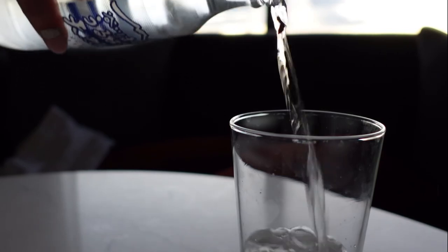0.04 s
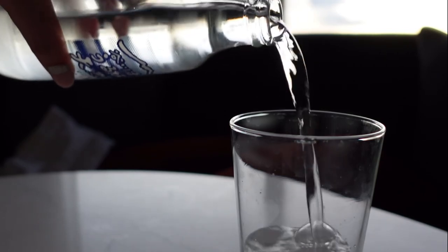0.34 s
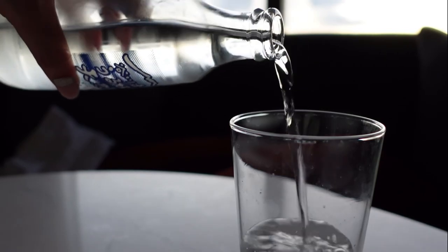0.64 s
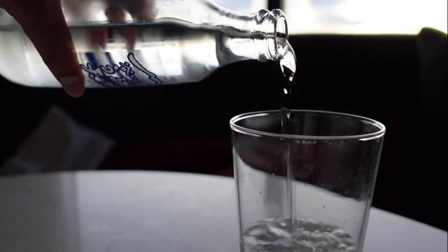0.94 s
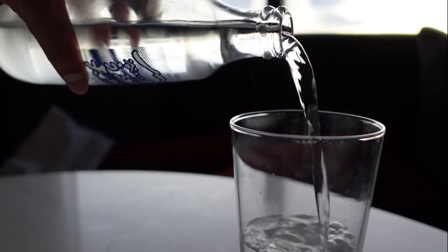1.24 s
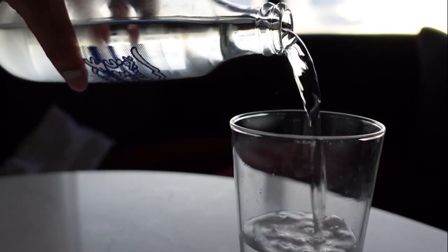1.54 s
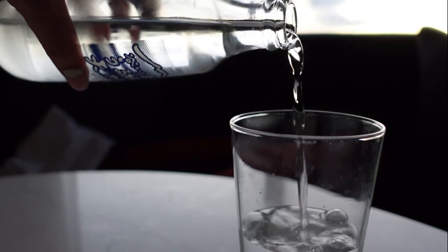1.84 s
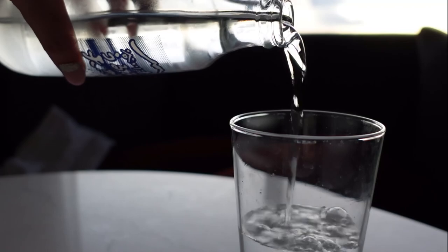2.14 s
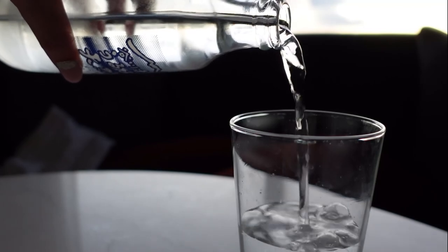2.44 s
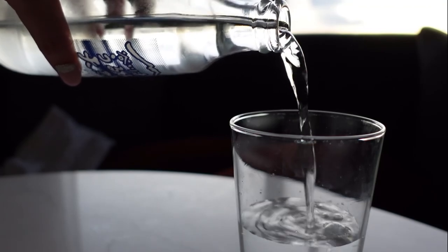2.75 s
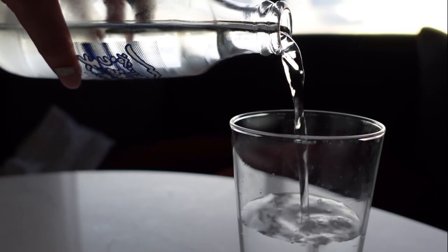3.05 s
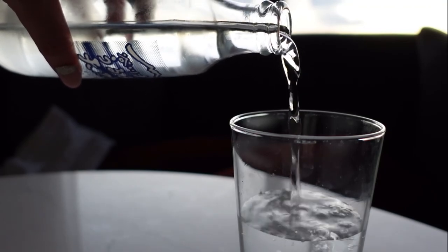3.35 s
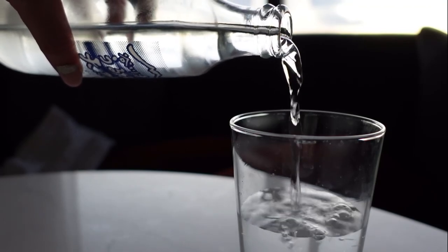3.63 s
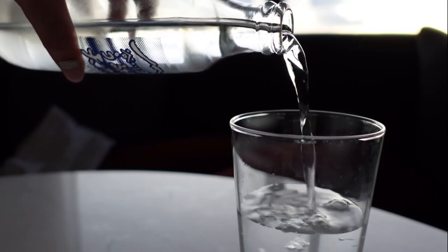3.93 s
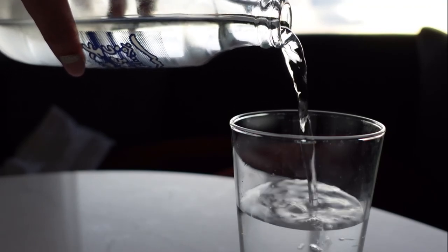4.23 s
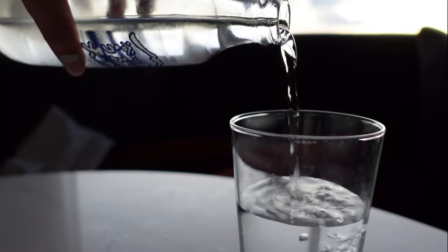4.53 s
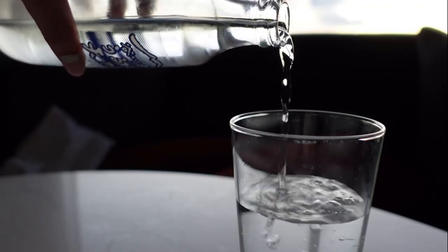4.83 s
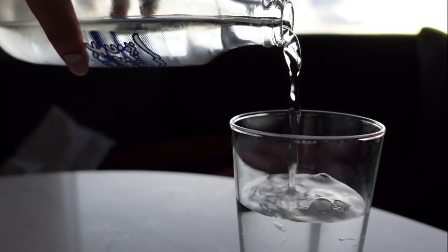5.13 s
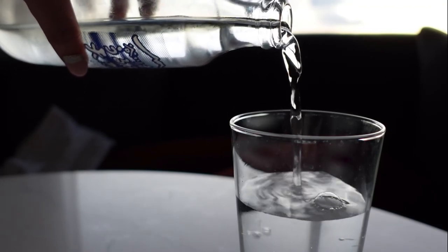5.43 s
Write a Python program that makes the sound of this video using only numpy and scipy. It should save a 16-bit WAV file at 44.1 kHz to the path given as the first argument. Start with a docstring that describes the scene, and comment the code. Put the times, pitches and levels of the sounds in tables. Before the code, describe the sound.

Water pours from a bottle into a drinking glass, close to the microphone and almost straight ahead, in a small quiet room. The pour is under way from the start, with bright splashing, bubbling plinks, tiny sharp pops and a few short hollow glugs. It eases briefly around 0.5 seconds, then surges again from about 0.8 to 1.4 seconds. After another dip, a cluster of plinks and crisp pops comes between 1.8 and 2.1 seconds, with a smaller one near 2.6. From about 3 seconds the stream is softer and thinner, a light trickle with separate plinks and occasional quick rising bubble chirps, picking up slightly around 4.2 and 4.8 seconds. The hollow ring of the glass climbs gently in pitch as it fills. The trickle is faint by the end, at about 5.7 seconds, over a very low room hush.

```python
"""Water poured from a bottle into a drinking glass on a table, close up, in a small quiet room.
The stream drags air under: each bubble rings briefly, small ones burst at the surface with sharp pops.
The air above the water rings along and climbs in pitch as the glass fills.
The splashing thins out to single plinks and whoops."""
import sys
import numpy as np
from scipy import signal
from scipy.io import wavfile
from scipy.ndimage import uniform_filter1d

SR = 44100
rng = np.random.default_rng(int(sys.argv[2]) if len(sys.argv) > 2 else 0)


def wav_record(signal):
    """Record a signal, one row per channel, as 16-bit PCM in the file named by sys.argv[1]."""
    frames = np.transpose(np.atleast_2d(signal))
    bounded = np.clip(frames, -1, 1)
    # unit amplitude maps onto the largest positive 16-bit level
    quanta = np.round(bounded * 32767).astype(np.int16)
    wavfile.write(sys.argv[1], SR, quanta)


N = 250488
BAND_LIMIT_HZ, SWELL_S = 16200, .001


def gain_of(db):
    """Decibels to amplitude."""
    return 10 ** (np.asarray(db) / 20)


def unit_rms(x):
    """Scales to rms 1."""
    return x / np.sqrt(np.mean(x ** 2) + 1e-20)


def at_hz(points, hz):
    """Interpolates on a log frequency axis."""
    f, value = np.transpose(points)
    return np.interp(np.log(hz + 1), np.log(f + 1), value)


def follow(rows, column):
    """One column of a control curve, per sample."""
    rows = np.array(rows)
    return np.interp(np.arange(N) / SR, rows[:, 0], rows[:, column])


def add(mix, start_s, sound):
    """Mixes a sound in at start_s."""
    part = mix[max(round(start_s * SR), 0):][:len(sound)]
    part += sound[:len(part)]


def colour(x, spectrum, size=4096):
    """Minimum-phase filter: attacks stay sharp."""
    log_gain = np.log(gain_of(at_hz(spectrum, abs(np.fft.fftfreq(size, 1 / SR)))))
    taps = np.fft.ifft(np.exp(np.conj(signal.hilbert(log_gain)))).real
    return signal.oaconvolve(x, taps[:size // 2])[:N]


def resonate(x, hz, width_hz):
    """Unity-gain resonance following the curve hz."""
    carrier = np.exp(2j * np.pi * np.cumsum(hz) / SR)
    pole = np.exp(-np.pi * width_hz / SR)
    return 2 * (carrier * signal.lfilter([1 - pole], [1, -pole], x / carrier + 1e-18)).real


# Room noise spectrum: (frequency [Hz], relative density [dB])
HUSH_SPECTRUM = [(15, -83), (25, -50), (157, -14.5), (476, -12.5), (659, -2), (1100, -6.5), (1260, -2),
                 (1480, -7.5), (1740, -5), (2350, -11.5), (3250, -9), (7710, -16.5), (14800, -20),
                 (16000, -27)]


def room_hush(level_db=-67):
    """Faint steady noise of the room's air."""
    return gain_of(level_db) * unit_rms(colour(rng.standard_normal(N), HUSH_SPECTRUM))


# Reverb decay: (frequency [Hz], T60 [s])
ROOM_T60 = [(150, .55), (600, .25), (1500, .17), (3500, .18), (8000, .2), (15000, .22)]
# Reverb spectrum: (frequency [Hz], gain [dB])
ROOM_SPECTRUM = [(150, 1), (600, -2.5), (1500, -5), (3200, -7.5), (7000, -8.5), (15000, -10)]


def room_tail(x, size=22050, predelay_s=.003, rise_s=.0018):
    """Diffuse reflections, each band decaying at its own rate."""
    noise = rng.standard_normal(size) * np.clip((np.arange(size) / SR - predelay_s) / rise_s, 0, 1)
    hz, t, bands = signal.stft(noise, SR, nperseg=256)
    t60_s = at_hz(ROOM_T60, hz)[:, None]
    decay = gain_of(-60 * t / t60_s) * np.sqrt(2 * np.log(1000) / (t60_s * SR))  # unit energy
    bands = bands * decay * gain_of(at_hz(ROOM_SPECTRUM, hz))[:, None]
    return signal.oaconvolve(x, signal.istft(bands, SR, nperseg=256)[1])[:N]


# Early reflections: (delay [s], gain [dB])
ECHOES = [(.0021, -15), (.0058, -18), (.0112, -19), (.0166, -12.5), (.0228, -22)]
# Their shared filter: (frequency [Hz], gain [dB])
ECHO_SPECTRUM = [(500, -12.5), (1200, -5), (3500, -6), (7000, -0.5), (14000, -11.5)]


def echoes(x):
    """Reflections off the table and nearby walls."""
    out, reflected = np.zeros(N), colour(x, ECHO_SPECTRUM)
    for delay_s, db in ECHOES:
        add(out, delay_s, gain_of(db) * reflected)
    return out


# Glass wall reflection: (frequency [Hz], gain [dB])
GLINT_SPECTRUM = [(1500, -38), (5000, -13), (9000, -14), (14000, -13.5)]


def wall_glint(x, delay_s=.0002):
    """The curved glass wall throws treble sideways."""
    out = np.zeros(N)
    add(out, delay_s, colour(x, GLINT_SPECTRUM))
    return out


# Air column over the rising water: (time [s], lowest mode [Hz], drive [dB])
AIR_COLUMN = [(0, 510.4, 4), (1.1, 545, 0.5), (1.8, 544.6, 8), (2.4, 575, 8), (3.0, 585, 9.5),
              (4.2, 617, 2.5), (5.68, 813, -3)]
# Lengthwise modes: (ratio to lowest, nominal width [Hz], gain [dB])
AIR_MODES = [(1, 57.3, 3.5), (2.1, 71, -2)]
# Modes across the glass, independent of fill: (frequency [Hz], width [Hz], gain [dB])
CROSS_MODES = [(1970, 39, -21), (2300, 110, -16), (3145, 100, -7), (3610, 70, -13.5)]


def glass(water):
    """The shrinking air column rings with every splash; the small mouth radiates little bass."""
    lowest_hz, drive = follow(AIR_COLUMN, 1), water * gain_of(follow(AIR_COLUMN, 2))
    modes = np.zeros(N)
    for ratio, width_hz, db in AIR_MODES:
        hz = lowest_hz * ratio
        modes += gain_of(db) * resonate(resonate(drive, hz, 2 * width_hz), hz, 2 * width_hz)
    for hz, width_hz, db in CROSS_MODES:
        modes += gain_of(db) * resonate(water, np.full(N, hz), width_hz)
    return signal.sosfilt(signal.butter(1, 260, "high", fs=SR, output="sos"), water + modes)


def bubble(hz, ring_s, glide_oct, surfacing_oct=.28, wobble_oct=.084, wobble_cycles=11):
    """An air pocket swells into its ring, glides (octaves per ring time) and chirps up as it surfaces."""
    t = np.arange(int(3.5 * ring_s * SR) + 2) / SR
    age = t / ring_s
    bend_oct = glide_oct * np.minimum(age, 2) + surfacing_oct * np.clip(age - 1, 0, 2) ** 2
    quiver = np.sin(2 * np.pi * (t * hz / wobble_cycles + rng.random()))  # the swirl deforms it
    bend_oct += wobble_oct * np.minimum(age, 1) * quiver
    cycles = np.cumsum(np.minimum(hz * 2 ** bend_oct, BAND_LIMIT_HZ)) / SR
    swell_s = min(max(SWELL_S, .8 / hz), ring_s / 3)
    swell = 1 - np.exp(-(t / swell_s) ** 2)
    return swell * np.exp(-age ** 1.7) * np.sin(2 * np.pi * cycles)


def snap(decay_s, size=900):
    """Noise burst of a tearing water film."""
    t = np.arange(size) / SR
    return rng.standard_normal(size) * np.exp(-t / decay_s) * np.minimum(2 * t / SWELL_S, 1)


# Low hollow glugs: (time [s], pitch [Hz], level [dB], ring [s])
GULPS = [(.004, 790, -31.5, 0.0029), (0.027, 845, -41.5, 0.024), (.06, 866, -33, 0.0036),
         (0.12, 752, -39, 0.021), (0.192, 504, -46.5, 0.0095), (.266, 537, -43, 0.0062),
         (0.272, 881, -38, 0.035), (.31, 545, -49.5, 0.011), (0.494, 516, -59, 0.019),
         (.775, 624, -51, 0.053), (.818, 611, -38.5, 0.011), (1.008, 546, -41.5, 0.0095),
         (1.028, 793, -24, 0.0084), (1.028, 504, -40.5, 0.025), (1.032, 804, -37, 0.034),
         (1.172, 712, -33.5, 0.008), (1.772, 605, -42.5, 0.012), (2.066, 657, -38, 0.0097),
         (2.412, 656, -52, 0.014)]


def gulps():
    """The air in the glass rings briefly as the stream gulps, along with a few big bubbles."""
    out = np.zeros(N)
    for s, hz, db, ring_s in GULPS:
        add(out, s, gain_of(db) * bubble(hz, ring_s, glide_oct=.033, surfacing_oct=.027, wobble_oct=.02))
    return out


# Rising bubbles: (time [s], length [s], start [Hz], end [Hz], start level [dB], end level [dB])
WHOOPS = [(.104, 0.031, 1095, 3930, -45.5, -33), (0.239, 0.0066, 3650, 4540, -35.5, -30),
          (0.367, 0.0098, 1787, 3420, -39, -25), (0.475, 0.019, 2212, 3220, -49, -28),
          (1.176, 0.024, 1146, 2750, -26.5, -42.5), (1.451, 0.02, 2200, 3290, -48, -42),
          (2.686, 0.011, 1345, 2710, -27, -39.5), (3.065, .035, 1148, 3250, -49, -35),
          (3.654, 0.017, 1720, 2490, -50, -56.5), (4.27, 0.033, 1590, 3060, -40.5, -53),
          (4.454, 0.029, 1736, 3290, -38, -59)]


def whoops(jostle=.41, rise_s=.0035, fade_s=.001):
    """A bubble rings higher as the water above it thins, levels off at the surface and dies."""
    out = np.zeros(N)
    for s, length_s, start_hz, end_hz, start_db, end_db in WHOOPS:
        t = np.arange(int(2 * length_s * SR)) / SR
        progress = np.minimum(t / length_s, 1)
        sweep = np.sin(np.pi / 2 * progress ** 1.6) ** 2
        hz = start_hz * (end_hz / start_hz) ** sweep
        gate = np.minimum(t / rise_s, 1) * np.exp(-np.maximum(t - length_s, 0) / fade_s)
        swirl = unit_rms(uniform_filter1d(uniform_filter1d(rng.standard_normal(len(t)), 70), 50))
        level = gain_of(start_db + (end_db - start_db) * progress) * gate * (1 + jostle * swirl)
        add(out, s, level * np.sin(2 * np.pi * np.cumsum(hz) / SR))
    return out


# Surface bursts: (time [s], level [dB], pitch [Hz], crack re ping before filtering [dB])
POPS = [(0.039, -33, 7540, -22), (.054, -11, 6970, -35), (0.174, -18, 8600, -18), (0.194, -20.5, 9460, -7),
        (0.259, -24, 9250, -21), (0.265, -23, 8260, -4), (.278, -30, 7540, -15), (0.3175, -20, 9450, -11),
        (0.3528, -28, 5630, -2), (.437, -42.5, 10560, 0), (.516, -27, 11100, -31), (.733, -28, 8460, -20),
        (0.752, -24.5, 6080, -7), (0.7905, -20.5, 8800, -7), (0.7972, -24.5, 6400, -13),
        (0.81, -23, 6250, -14), (0.8167, -22.5, 7200, -6), (0.858, -21.5, 7970, -30),
        (0.8833, -26, 12400, -0.5), (.922, -29.5, 6330, -22), (0.933, -29.5, 7320, -20),
        (.952, -29, 6450, -27), (1.0086, -15.5, 7420, -9.5), (1.235, -35.5, 12000, -14),
        (1.285, -34.5, 6440, -11.5), (1.577, -47.5, 12400, -2), (1.877, -27, 6400, -8),
        (1.8949, -15.5, 7820, -6), (1.8962, -14.5, 8870, -21), (1.961, -17.5, 9040, -10.5),
        (1.9852, -29, 8850, -4), (2.0036, -23.5, 6700, -3.5), (2.0101, -21, 11570, -3),
        (2.032, -25.5, 6740, -5), (2.0498, -11.5, 6790, -5), (2.2674, -35.5, 8100, -2.5),
        (2.277, -34, 12800, 1.5), (2.389, -22, 6900, -21), (2.4065, -32, 10720, -6),
        (2.5108, -33.5, 6800, -7), (2.5194, -26.5, 10300, -3), (2.534, -34, 11900, -13),
        (2.6301, -21, 6730, -19), (2.646, -22, 10900, -5.5), (2.7436, -34.5, 6460, 1.5),
        (3.2178, -43, 6220, -4), (3.2748, -34, 6500, -13.5), (3.405, -30, 6400, -39),
        (3.476, -43, 6500, -16), (3.49, -44, 6900, -14), (4.0192, -40, 6700, -18), (4.13, -41.5, 6650, -26),
        (4.3256, -40.5, 6440, -7.5), (4.4394, -40.5, 6500, -10), (4.67, -31.5, 6350, -15),
        (4.7976, -32, 9100, -10.5), (4.8228, -19.5, 9750, -15.5), (4.8346, -40, 9650, -17),
        (4.878, -42, 7130, -6), (4.9814, -37, 11400, -12.5), (5.091, -37.5, 5900, -22)]
# Crack and spray filter: (frequency [Hz], gain [dB])
SPRAY_SPECTRUM = [(2000, -18.5), (5000, -15), (6000, 2), (6650, 6.5), (7500, 4), (8800, 6.5), (10000, 2),
                  (11600, 5.5), (12700, -5), (16000, -9)]


def pops(ring_s=.0013, glide_oct=.013, droplets=3, droplet_db=-19, droplet_ring_s=.00067, scatter_s=.064):
    """Tiny bubbles burst with a ping and a crack; flung droplets ping as they land."""
    pings, cracks = np.zeros(N), np.zeros(N)
    for s, db, hz, crack_db in POPS:
        add(pings, s, gain_of(db) * bubble(hz, ring_s, glide_oct, surfacing_oct=0))
        add(cracks, s, gain_of(db + crack_db) * snap(decay_s=.0018))
        for lag, pitch in rng.random((droplets, 2)):
            droplet = bubble(6400 * 1.8 ** pitch, droplet_ring_s, glide_oct, surfacing_oct=0)
            add(pings, s + scatter_s * lag, gain_of(db + droplet_db) * droplet)
    return pings + colour(cracks, SPRAY_SPECTRUM)


# Distinct bubbles: (time [s], pitch [Hz], level [dB], ring [s])
PLINKS = [(.005, 2220, -30.5, 0.0051), (0.0444, 4560, -23, 0.0027), (.089, 3270, -31.5, 0.0078),
          (0.105, 5570, -32, 0.0034), (.191, 1226, -17, 0.0062), (0.211, 1009, -29.5, 0.014),
          (0.2238, 1006, -31, 0.014), (.252, 5300, -33, .003), (0.273, 2210, -25.5, 0.0046),
          (0.305, 1154, -30, 0.0068), (.305, 3230, -33, 0.0035), (.317, 3300, -32.5, 0.0046),
          (0.354, 4880, -21, 0.002), (.375, 3050, -18, 0.0018), (0.468, 1060, -36.5, 0.0072),
          (0.489, 3870, -32, 0.0015), (.491, 1070, -31.5, 0.0063), (.494, 3040, -22, 0.0034),
          (0.504, 1164, -33.5, 0.0042), (0.505, 4260, -32, 0.0038), (0.639, 3520, -36.5, 0.0044),
          (.663, 1880, -38.5, 0.0034), (0.7437, 2590, -31, 0.0051), (0.772, 1324, -27, 0.011),
          (0.794, 1290, -30.5, 0.013), (.798, 4900, -24.5, 0.0017), (0.8176, 2494, -26, 0.0047),
          (0.833, 1654, -32, 0.0085), (0.884, 2540, -24, 0.0029), (.938, 3280, -25.5, 0.0024),
          (.952, 3190, -30, 0.0035), (0.983, 2930, -24.5, 0.0028), (1.005, 1020, -27.5, 0.012),
          (1.028, 1050, -17.5, 0.0054), (1.0849, 4220, -25, 0.0039), (1.089, 3445, -30, .004),
          (1.123, 2970, -21.5, 0.0028), (1.087, 1066, -37, 0.02), (1.109, 2150, -33, 0.005),
          (1.152, 1014, -32.5, 0.028), (1.156, 3510, -23.5, 0.0028), (1.17, 1114, -19, 0.014),
          (1.195, 2500, -28, .003), (1.23, 1590, -29, 0.0043), (1.242, 2390, -33, 0.0047),
          (1.284, 4400, -31.5, 0.002), (1.305, 2720, -26, 0.0013), (1.329, 2220, -31.5, 0.0048),
          (1.332, 6000, -37, 0.0065), (1.372, 2350, -32.5, 0.0075), (1.374, 5260, -28, 0.002),
          (1.395, 2120, -27.5, 0.0024), (1.416, 2750, -24, 0.0055), (1.468, 1260, -37.5, 0.0084),
          (1.534, 2270, -38.5, .004), (1.597, 2153, -39, .004), (1.62, 6080, -43.5, 0.0032),
          (1.651, 3740, -38.5, 0.0037), (1.7335, 3274, -30.5, 0.012), (1.7701, 4400, -15, 0.0011),
          (1.771, 1352, -35.5, 0.015), (1.776, 1795, -25.5, 0.0047), (1.797, 1770, -20.5, 0.0023),
          (1.834, 1310, -32, 0.0075), (1.8968, 2130, -25.5, 0.0037), (1.919, 1814, -26, 0.0041),
          (2.032, 1332, -28.5, 0.017), (2.032, 4080, -32.5, 0.0061), (2.0656, 1400, -17, 0.0098),
          (2.066, 1138, -31, 0.0082), (2.0663, 2000, -26, 0.0052), (2.131, 2510, -35, 0.0034),
          (2.276, 2060, -34, 0.0039), (2.321, 4550, -39.5, 0.008), (2.369, 3110, -28.5, 0.0037),
          (2.368, 1340, -44, 0.013), (2.391, 1307, -40, 0.0098), (2.418, 1407, -31, 0.0062),
          (2.431, 1257, -37, 0.0063), (2.58, 3160, -48, 0.0093), (2.629, 2580, -32, 0.0065),
          (2.63, 1357, -38, 0.0093), (2.646, 2010, -25, 0.0027), (2.649, 1570, -27.5, 0.0062),
          (2.682, 1326, -32, 0.01), (2.744, 1810, -38, 0.0065), (2.8932, 1295, -42, 0.0087),
          (2.8948, 3280, -29.5, 0.0085), (2.977, 3240, -38, 0.013), (2.985, 1175, -48.5, 0.014),
          (2.985, 1880, -35.5, 0.0062), (3.125, 2750, -39, 0.0064), (3.03, 1480, -34, 0.011),
          (3.058, 1234, -53.5, 0.022), (3.092, 1720, -33.5, 0.0077), (3.156, 1810, -30.5, 0.0024),
          (3.274, 2110, -36, 0.0034), (3.519, 1600, -38.5, 0.0039), (3.562, 1640, -41, 0.0049),
          (3.58, 1500, -45, 0.0054), (3.792, 1980, -47, 0.0046), (3.8187, 2080, -35, 0.0013),
          (3.8365, 2367, -40.5, 0.0078), (3.996, 1253, -50.5, 0.029), (4.0428, 1404, -42.5, 0.024),
          (4.139, 2140, -36.5, 0.0036), (4.194, 3490, -38, 0.007), (4.221, 1740, -30, 0.0033),
          (4.2261, 1350, -30, 0.0088), (4.225, 3260, -39, 0.0057), (4.301, 3130, -39, 0.01),
          (4.326, 1584, -35.5, 0.01), (4.448, 1710, -33.5, 0.0067), (4.4847, 1850, -31.5, 0.0048),
          (4.508, 1734, -42.5, 0.01), (4.652, 4450, -44, 0.0044), (4.708, 3390, -29.5, 0.0037),
          (4.8, 2300, -30, 0.0025), (4.859, 1720, -33, 0.0048), (4.879, 2060, -32.5, 0.0043),
          (4.88, 1580, -30, 0.0029), (5.014, 3390, -50.5, .006), (5.018, 2805, -45, 0.006),
          (5.02, 1654, -51, .007), (5.246, 2037, -34, 0.0063), (5.248, 3580, -39, 0.0011),
          (5.309, 2230, -38, 0.0042), (5.3221, 2176, -35.5, 0.0062), (5.66, 3200, -40.5, 0.0017)]
# Pinch-off filter: (frequency [Hz], gain [dB])
PINCH_SPECTRUM = [(40, -20), (300, -15.5), (550, -20), (1500, 16), (3200, 7), (5500, -10), (15000, -22)]


def plinks(sag_oct=-.054, full_snap_ring_s=.0029, plop_db=9, plop_width_hz=90):
    """Bubbles pinch off and sag in pitch as they are dragged down; each snap rings the upper air modes."""
    rings, tears = np.zeros(N), np.zeros(N)
    for s, hz, db, ring_s in PLINKS:
        add(rings, s, gain_of(db) * bubble(hz, ring_s, sag_oct))
        snap_db = db - 19.5 + .36 * (db + 16.5)  # loud bubbles snap harder
        size_gain = np.sqrt(min(ring_s / full_snap_ring_s, 1))
        add(tears, s, gain_of(snap_db) * size_gain * snap(decay_s=.0035))
    snaps = colour(tears, PINCH_SPECTRUM)
    modes_hz = [follow(AIR_COLUMN, 1) * AIR_MODES[1][0]] + [np.full(N, row[0]) for row in CROSS_MODES]
    plops = sum(resonate(snaps, hz, plop_width_hz) for hz in modes_hz)
    return rings + snaps + gain_of(plop_db) * plops


def swarm(churn_db, per_s, low_hz, high_hz, cycles, spread_db, sizes=64):
    """Small bubbles of many sizes at an even level; harder churning crowds them closer."""
    out, crowding = np.zeros(N), np.cumsum(gain_of(churn_db / 2))
    per_size = int(per_s * N / SR / sizes)
    for hz in np.geomspace(low_hz, high_hz, sizes):
        ring_s = cycles * np.exp(.4 * rng.standard_normal()) / hz
        ping = bubble(hz, ring_s, glide_oct=rng.normal(0, .07), surfacing_oct=0)
        when, loudness, polarity = rng.random((600, 3))[:per_size].T
        gains = np.sign(polarity - .5) * gain_of(spread_db * np.minimum(-np.log(1 - loudness), 3))
        starts_s = np.searchsorted(crowding, when * crowding[-1]) / SR
        for s, gain in zip(starts_s, gains):
            add(out, s, gain * ping)
    local_power = abs(uniform_filter1d(out ** 2, size=2400))
    return out / np.sqrt(local_power + .0011 * np.mean(out ** 2))


def splash_gain(start_s, length_s, rise_db_per_s=598.5, fall_db_per_s=219.5):
    """One splash flares up, holds and dies away."""
    t = np.arange(N) / SR
    db = np.minimum((t - start_s) * rise_db_per_s, (start_s + length_s - t) * fall_db_per_s)
    return gain_of(np.clip(db, -100, 0))


# Steady churn, easing as the water deepens: (time [s], bubbles [dB], spray [dB]), before trims
FLOW = [(0.0, -42, -45), (0.24, -41, -47.5), (0.52, -51, -68), (0.77, -49.5, -67.5), (0.92, -47, -50.5),
        (1.23, -45, -58.5), (1.36, -49, -70), (1.57, -54, -69), (1.98, -51.5, -59), (2.09, -62, -63),
        (2.34, -61.5, -67.5), (2.59, -60, -63.5), (2.85, -60, -72), (3.07, -56.5, -73),
        (3.31, -63.5, -70.5), (4.67, -65, -73.5), (4.84, -67, -70), (5.68, -72, -78)]
# The stream wavers and breaks: (time [s], length [s], bubbles [dB], spray [dB], pitch [Hz]), before trims
SPLASHES = [(0, .06, -45, -47, 2780), (0.115, .03, -33, -50, 4170), (0.189, .06, -43, -46, 2950),
            (0.309, .07, -40, -53.5, 2680), (0.49, .02, -37, -59.5, 3900), (0.694, .04, -49, -72.5, 2730),
            (0.771, .09, -49, -51, 2570), (0.936, .14, -45, -55, 4050), (1.329, .08, -44.5, -71, 3000),
            (1.62, .05, -53, -75.5, 3510), (1.77, .04, -43, -65, 3100), (1.91, .04, -46, -54.5, 2260),
            (2.062, .025, -37, -53, 2040), (2.289, .04, -52.5, -68, 3500), (2.369, .06, -53, -66, 3650),
            (2.628, .04, -47, -59, 2650), (2.888, .06, -46, -78.5, 3500), (2.98, .15, -52, -81.5, 2300),
            (3.271, .03, -58, -70, 2380), (3.522, .17, -62, -76.5, 1770), (3.835, .04, -63, -82, 2100),
            (4.221, .1, -59, -82, 2530), (4.811, .06, -62, -66, 2060)]


def churn(bubbles_trim_db=-5.5, spray_trim_db=-6, splash_trim_db=-5):
    """Bubble and spray levels in dB: power sum of steady flow and splashes."""
    power = gain_of([follow(FLOW, 1) + bubbles_trim_db, follow(FLOW, 2) + spray_trim_db]) ** 2
    for s, length_s, bubbles_db, spray_db, _ in SPLASHES:
        power += (gain_of([[bubbles_db + splash_trim_db], [spray_db]]) * splash_gain(s, length_s)) ** 2
    return 10 * np.log10(power)


# Small-bubble filter: (frequency [Hz], relative gain [dB])
GURGLE_SPECTRUM = [(200, -44.5), (450, 9.5), (800, -20.5), (1200, -4.5), (2200, 3.5), (3300, 7),
                   (4400, 9.5), (5800, 3.5), (9000, -32)]


def stream(gurgle_trim_db=-1, cloud_trim_db=-11, cloud_oct=.34, tiny_hz=3770, tiny_db_per_s=-1.5):
    """The landing stream churns up froth and spray; each splash adds a cloud of like-sized bubbles."""
    bubbles_db, spray_db = churn()
    froth = swarm(bubbles_db, per_s=2600, low_hz=820, high_hz=6765, cycles=9.3, spread_db=7.5)
    spray = swarm(spray_db, per_s=1600, low_hz=5000, high_hz=15000, cycles=12, spread_db=9.5)
    # the fall shortens as the glass fills, so the tiniest bubbles fade
    large = signal.sosfiltfilt(signal.butter(3, tiny_hz, fs=SR, output="sos"), froth)
    froth = large + (froth - large) * gain_of(tiny_db_per_s * np.arange(N) / SR)
    out = unit_rms(colour(froth, GURGLE_SPECTRUM)) * gain_of(bubbles_db + gurgle_trim_db)
    out += unit_rms(colour(spray, SPRAY_SPECTRUM)) * gain_of(spray_db)
    for s, length_s, db, _, hz in SPLASHES:
        band = signal.butter(2, [hz / 2 ** cloud_oct, hz * 2 ** cloud_oct], "band", fs=SR, output="sos")
        span = slice(max(int((s - .1) * SR), 0), int((s + length_s + .25) * SR))
        cloud = unit_rms(signal.sosfilt(band, froth[span]))
        out[span] += gain_of(db + cloud_trim_db) * splash_gain(s, length_s)[span] * cloud
    return out


def scene(room_side_db=-8, hush_side_db=-10):
    """The glass stands almost straight ahead; its wall and the room add a little width."""
    direct = glass(plinks() + whoops() + gulps() + pops() + stream())
    mid = direct + room_tail(direct) + room_hush() + echoes(direct)
    side = gain_of(room_side_db) * room_tail(direct) + gain_of(hush_side_db) * room_hush()
    side += wall_glint(direct)
    return np.array([mid + side, mid - side]) * gain_of([[-.4], [.4]])


def record(dry):
    """Microphone bass roll-off, then the band limit."""
    thin = signal.sosfilt(signal.butter(1, 110, "high", fs=SR, output="sos"), dry)
    lowpass = signal.firwin(511, BAND_LIMIT_HZ, window=("kaiser", 9), fs=SR)
    return signal.oaconvolve(thin, lowpass[None], "same")


dry = scene()
out = record(dry)
wav_record(out)
```